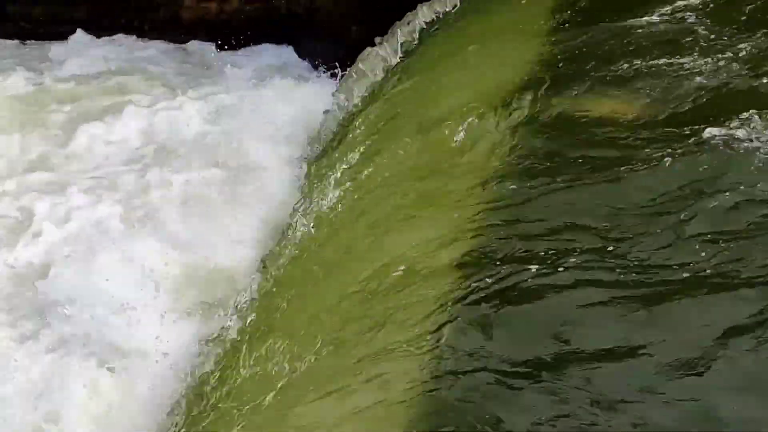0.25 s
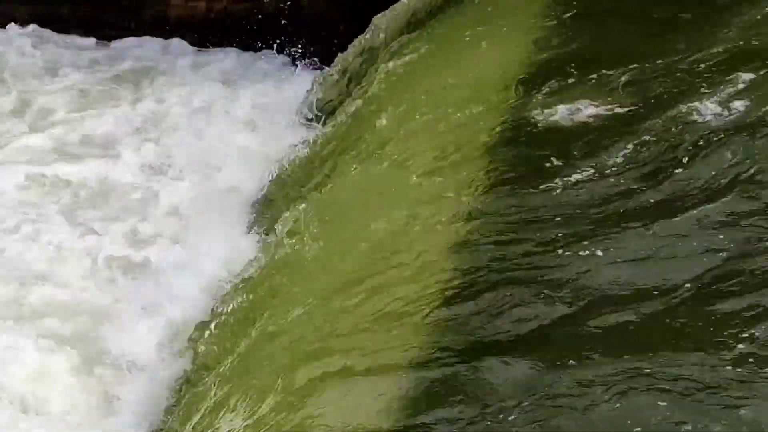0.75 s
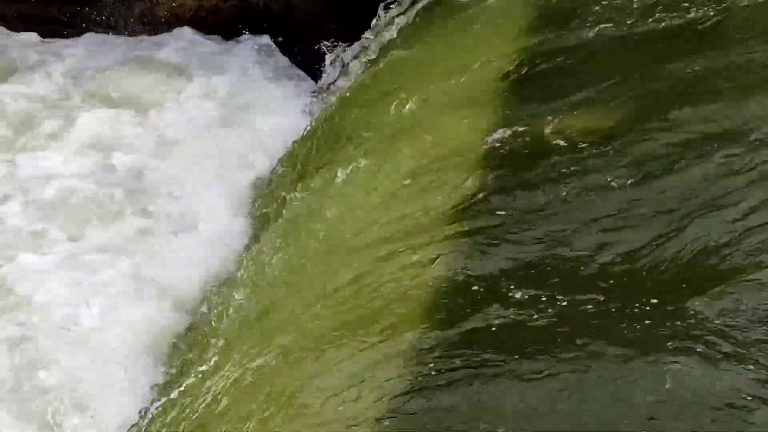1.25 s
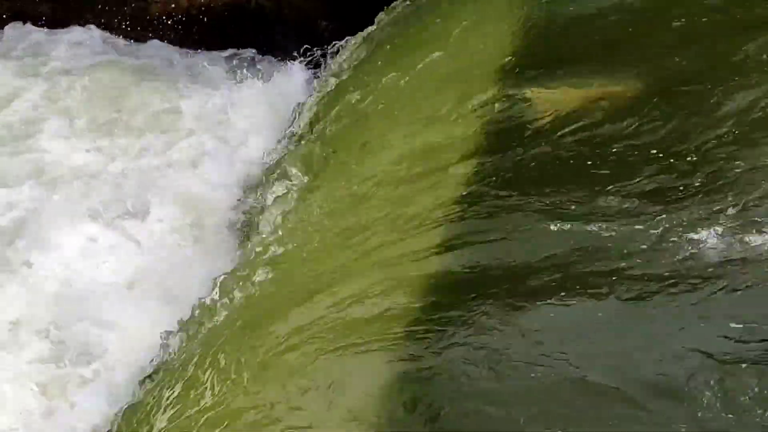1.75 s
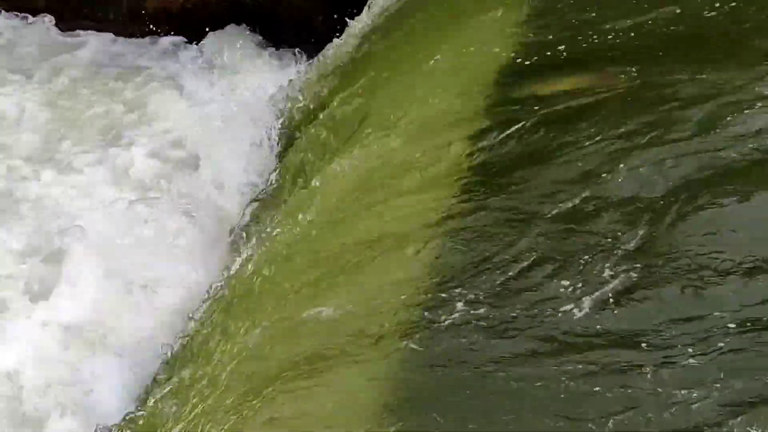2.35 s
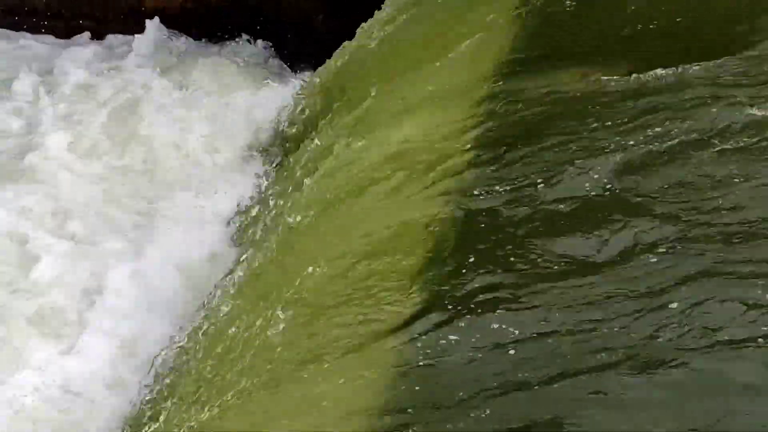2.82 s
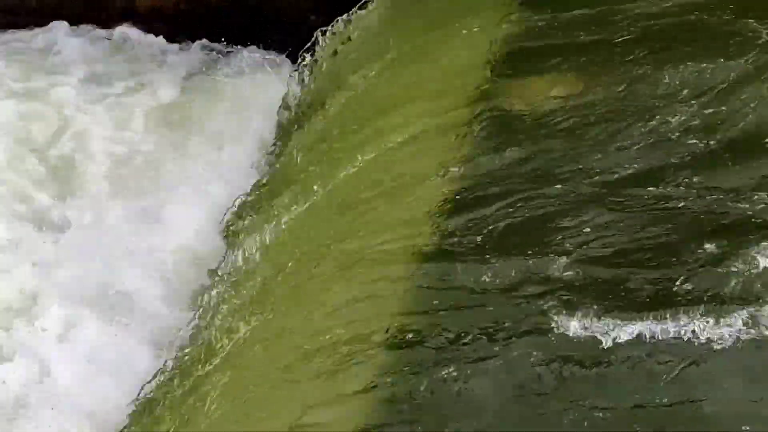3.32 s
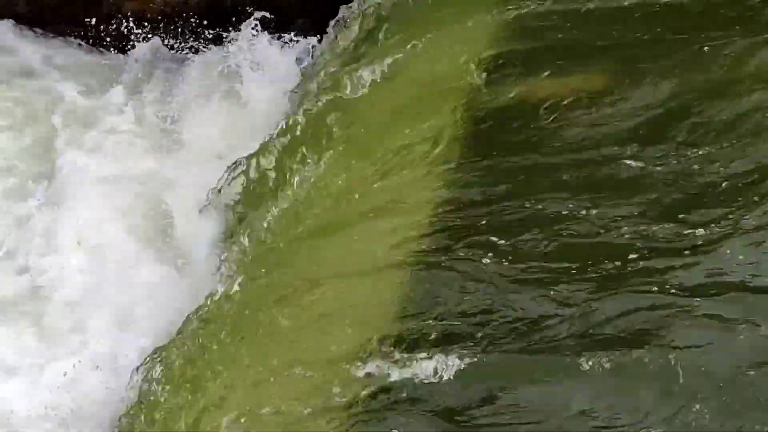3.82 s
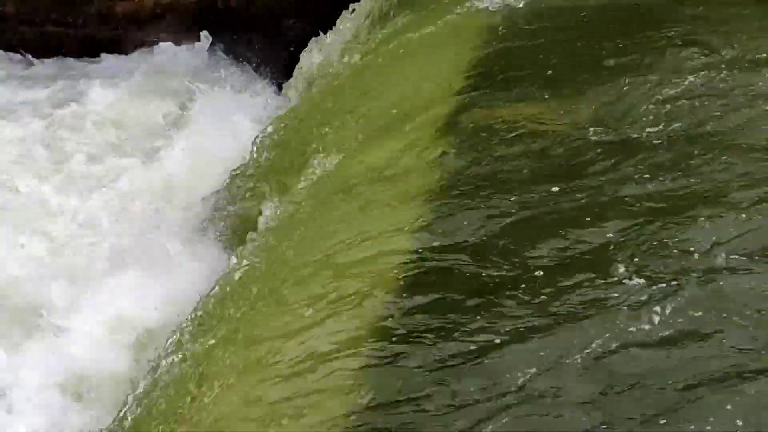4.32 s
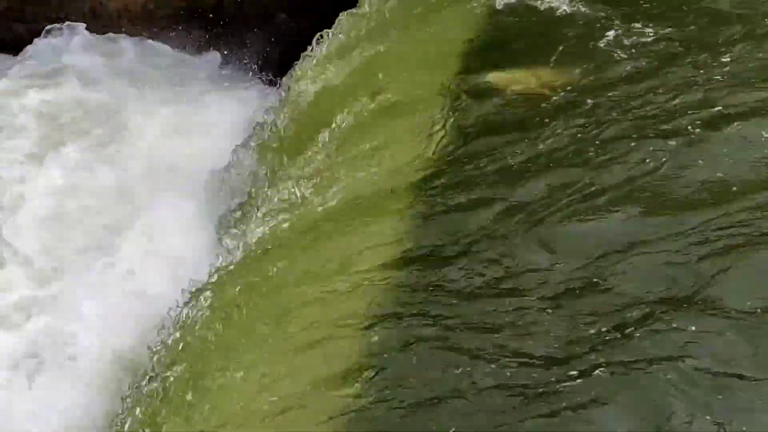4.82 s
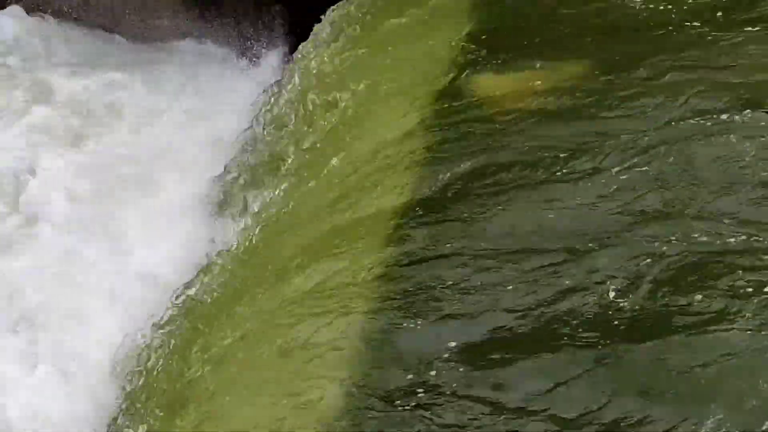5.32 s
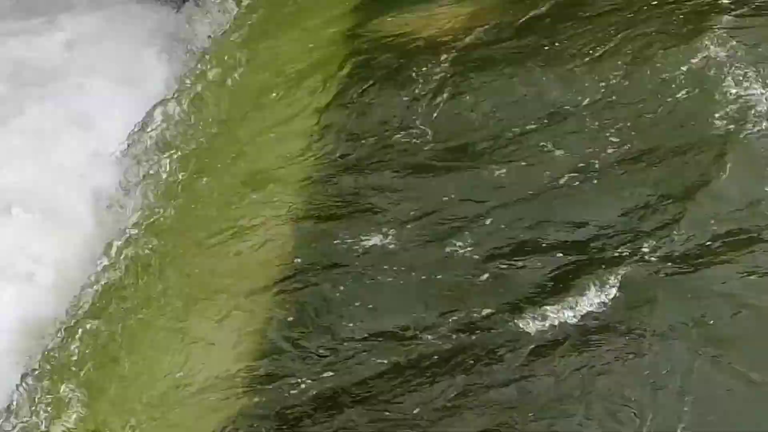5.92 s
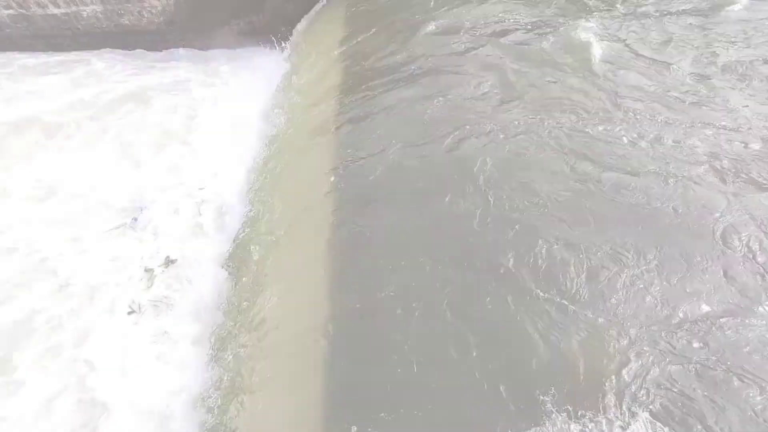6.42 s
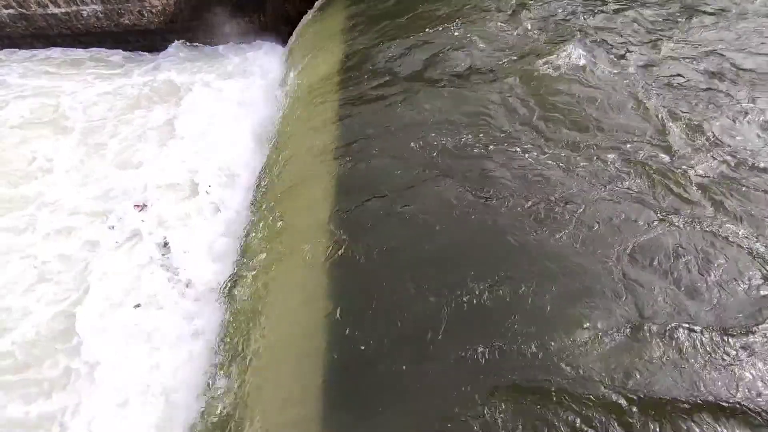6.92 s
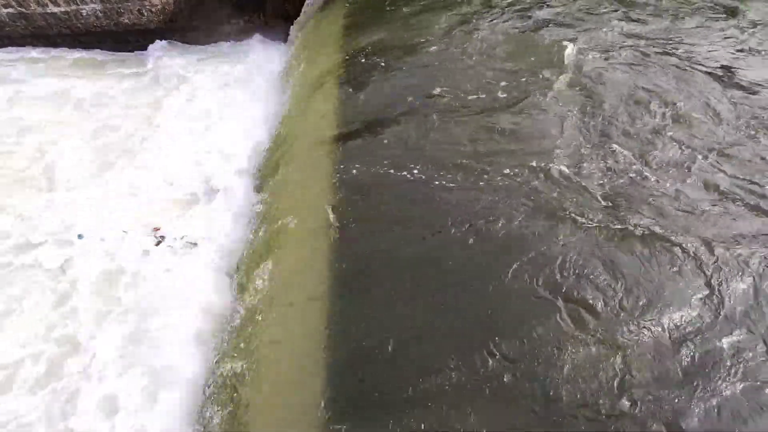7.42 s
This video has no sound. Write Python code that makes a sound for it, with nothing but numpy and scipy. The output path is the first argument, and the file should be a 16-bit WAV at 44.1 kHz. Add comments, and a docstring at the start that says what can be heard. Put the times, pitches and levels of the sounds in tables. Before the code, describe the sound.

Heavy water pours over a weir in a dense low rumble with bubbling foam, dips briefly to near silence, then returns slightly louder.

```python
"""At a concrete weir a river pours into a pool of white water, heard by a mono microphone at two spots on the bank.
Clouds of trapped air throb in the plunge pool, single bubbles ring in the foam, and spray patters back as a fine hiss;
all three are random impulses ringing resonators, mixed with noise. Now and then a mass of air collapses with a thump:
the roar swells briefly, and a limiter ducks the whole rush where peaks pass its ceiling. A far bird, two swept sines,
chirps faintly twice at the first spot. The sound fades out there and fades in again at the second spot."""
import sys
import numpy as np
from scipy import signal
from scipy.fft import rfft, irfft, next_fast_len
from scipy.io import wavfile
from scipy.ndimage import uniform_filter1d, minimum_filter1d

SR = 44100
rng = np.random.default_rng(int(sys.argv[2]) if len(sys.argv) > 2 else 0)


def generate_wav(signal):
    """Clip the signal to [-1, 1] and save it as 16-bit WAV at the path in sys.argv[1]."""
    frames = np.transpose(np.atleast_2d(signal))
    scaled = np.clip(frames, -1, 1) * 32767
    pcm = np.round(scaled).astype(np.int16)
    wavfile.write(sys.argv[1], SR, pcm)


N = 337806


def from_db(db):
    """Decibels to gain."""
    return 10 ** (np.asarray(db) / 20)


def rms_one(x):
    """Scale to an rms of 1."""
    return x / np.sqrt(np.mean(x ** 2) + 1e-20)


def in_time(rows):
    """Each column after the time as a curve over all samples, straight between the rows."""
    time_s, *columns = np.transpose(rows)
    return [np.interp(np.arange(N) / SR, time_s, column) for column in columns]


def bump(center_s, length_s):
    """A smooth rise and fall from 0 to 1 and back, centred on a moment."""
    shape_s = center_s + length_s * np.linspace(-.5, .5, 33)
    return np.interp(np.arange(N) / SR, shape_s, np.hanning(33))


def drift(rate_hz):
    """Slow chance with a spread of 1: noise twice through a one-pole low-pass."""
    step = 40  # samples between slow values
    pole = np.exp(-2 * np.pi * rate_hz * step / SR)
    noise = rng.standard_normal(N // step + 2002)
    # the first values, where the filter settles, are dropped
    slow = signal.lfilter([1], [1, -2 * pole, pole * pole], noise)[2000:]
    return np.interp(np.arange(N) / step, np.arange(len(slow)), rms_one(slow))


def coloured(x, spectrum):
    """Filter a sound by a spectral curve that falls away steeply past its ends; rms 1."""
    size = next_fast_len(N)
    octave = np.log2(np.maximum(np.arange(size // 2 + 1) * SR / size, 1))
    pitch_hz, level_db = np.transpose(spectrum)
    edge = np.log2(pitch_hz)
    octaves_outside = np.abs(octave - np.clip(octave, edge[0], edge[-1]))
    gain_db = np.interp(octave, edge, level_db) - 60 * octaves_outside
    return rms_one(irfft(rfft(x, size) * from_db(gain_db), size)[:N])


def grains(per_s, spread_db, low_hz, high_hz, cycles, count):
    """Random impulses of uneven size ring resonators that fall 60 dB in some cycles; even in spectrum, rms 1."""
    born = np.flatnonzero(rng.random(N) < per_s / SR)
    size, sign, pitch = rng.random((N, 3))[:len(born)].T
    # many small impulses and a few large ones, capped in size
    size_db = spread_db * np.minimum(-np.log(1 - size), 4)
    push = from_db(size_db) * np.sign(sign - .5)
    resonator = (pitch * count).astype(int)
    out = np.zeros(N)
    for k, hz in enumerate(np.geomspace(low_hz, high_hz, count)):
        clicks = np.zeros(N)
        clicks[born] = push * (resonator == k)
        radius = np.exp(-np.log(1000) * hz / (cycles * SR))
        angle = 2 * np.pi * hz / SR
        ringing = signal.lfilter([1, 0, -1], [1, -2 * radius * np.cos(angle), radius ** 2], clicks + 1e-18)
        # higher resonators cover more hertz, so they carry more power
        out += np.sqrt(hz) * rms_one(ringing)
    return rms_one(out)


# colour of the plunge pool at the first and second spot: pitch_hz, level_db (relative, per Hz)
ROAR_COLOUR_FIRST = [(15, -38), (30, -31), (45, -19.5), (62, -10.5), (85, -5), (120, -3.5), (165, 0.67),
                     (265, -2), (320, -6.5), (390, -14), (450, -19.5)]
ROAR_COLOUR_SECOND = [(18, -43.5), (35, -29), (50, -21), (72, -6.5), (118, -5), (152, -0.5), (195, -4),
                      (245, -4.5), (310, -9.5), (365, -17.5), (450, -29)]
# depth of the plunge; a deeper one traps larger, lower clouds: time_s, bass_lift_db (treble gets the opposite)
PLUNGE_DEPTH = [(.4, 0.2), (.9, -2.3), (3.7, -1.4), (4.6, 1.8), (5.3, 0.8), (5.9, 2.5), (6.5, -0.9),
                (7.1, 0.7)]


def roar(spectrum, churn_db=0.0, throb_db=-0.1, pivot_hz=180):
    """Air clouds pulse for a few cycles each over the churning of the pool."""
    clouds = grains(per_s=700, spread_db=3.0, low_hz=55.0, high_hz=415, cycles=6.6, count=14)
    churn = coloured(rng.standard_normal(N), [(20, 0.0014), (500, 0.0025)])
    pool = coloured(clouds + from_db(churn_db) * churn, spectrum)
    # the large clouds and the small ones trade level as the plunge deepens
    large = signal.sosfiltfilt(signal.butter(2, pivot_hz, fs=SR, output="sos"), pool)
    small = pool - large
    lift_db, = in_time(PLUNGE_DEPTH)
    pool = large * from_db(lift_db) + small * from_db(-lift_db)
    # so many clouds overlap that the power over a quarter second hardly varies
    power = uniform_filter1d(pool ** 2, size=SR // 4)
    steady = pool / np.sqrt(power + 1e-12)
    return rms_one(steady * from_db(throb_db * drift(21)))


# colour of the foam at the first and second spot: pitch_hz, level_db (relative, per Hz)
FOAM_COLOUR_FIRST = [(400, -3.5), (480, -0.5), (620, -5.5), (950, -9.5), (1060, -13.5), (1220, -15.5),
                     (1400, -26), (1500, -30)]
FOAM_COLOUR_SECOND = [(400, -1), (460, -.5), (560, -4), (610, -2), (900, -7), (1000, -9.5), (1070, -19),
                      (1140, -18.5), (1280, -13.5), (1500, -23)]


def foam(spectrum, folding, wash_db=0.0, folding_db=-0.04):
    """Bubbles ring, more of them as the white water folds over; far ones merge into a wash."""
    bubbles_per_s = 2400 * from_db(2.5 * folding)
    bubbles = grains(bubbles_per_s, spread_db=2.5, low_hz=390.5, high_hz=1558, cycles=8.6, count=20)
    wash = coloured(rng.standard_normal(N), [(350, 0), (1600, 0.0091)])
    return coloured((bubbles + from_db(wash_db) * wash) * from_db(folding_db * folding), spectrum)


# colour of the spray at the first and second spot: pitch_hz, level_db (relative, per Hz)
SPRAY_COLOUR_FIRST = [(1300, -17), (1500, -4.5), (1720, 0), (2350, -2.5), (2850, -7.5), (3480, -8.5),
                      (3620, -12), (4200, -15.5), (5120, -9.5), (5680, -15), (5950, -6.5), (6400, -5),
                      (6900, -0.9), (7550, -0.5)]
SPRAY_COLOUR_SECOND = [(1300, -18), (1520, -1), (1900, -1.5), (2250, 1), (2850, -6), (3480, -7.5),
                       (3620, -12.5), (4400, -14.5), (4900, -14), (5720, -15), (6000, -5), (6900, -2.5),
                       (7300, -2.5), (7550, -10.5)]


def spray(spectrum, folding, mist_db=0.0, folding_db=0.21, flicker_db=0.07):
    """Drops and tiny bubbles tick in bursts over a smooth mist."""
    drops_per_s = 7000 * from_db(2.5 * drift(25))
    drops = grains(drops_per_s, spread_db=2.0, low_hz=1340, high_hz=7960, cycles=6, count=16)
    mist = coloured(rng.standard_normal(N), [(1200, 0), (8000, 0.008)])
    level_db = folding_db * folding + flicker_db * drift(45)
    return coloured((drops + from_db(mist_db) * mist) * from_db(level_db), spectrum)


# the white water folds over in a bigger splash: center_s, foam_rise_db
BIG_SPLASHES = [(.19, 2.5), (2.73, 3.5), (3.58, 3), (4.21, 1.5), (5.25, 1.5), (6.73, 4), (6.98, 3),
                (7.1, 3.5), (7.61, 0)]


def splash_rise(length_s=0.12):
    """Bigger splashes as a smooth rise and fall of level in dB."""
    return sum(rise_db * bump(center_s, length_s) for center_s, rise_db in BIG_SPLASHES)


# a mass of trapped air collapses with a thump: center_s, peak_db (aim for the swollen part of the roar)
AIR_THUMPS = [(.355, -3.5), (3.255, -1), (3.499, -2.5), (3.861, -1.8), (4.3, 0), (4.438, -2.5),
              (4.671, -.7), (5.01, -2.5), (5.393, 0), (5.56, 0), (5.812, -2.1), (7.267, 0.5), (7.39, 0)]


def thumping(pool, lowest_hz=120, length_s=0.027):
    """The air clouds pulse together and the roar, but for its deepest part, swells towards the thump's peak."""
    clouds = signal.sosfiltfilt(signal.butter(3, lowest_hz, "high", fs=SR, output="sos"), pool)
    out = pool.copy()
    for center_s, peak_db in AIR_THUMPS:
        swell = clouds * bump(center_s, length_s)
        # a roar that is already louder is left alone
        out += swell * max(from_db(peak_db) / np.abs(swell).max() - 1, 0)
    return out


# the plunge pool at the first and second spot swells and eases slowly: time_s, roar_db, foam_db
POOL_FLOW_FIRST = [(0, -16, -28), (.45, -13.5, -26), (.85, -17.5, -27), (2.45, -17, -26.5),
                   (2.75, -14.5, -26.5), (3.6, -14.5, -28), (4.6, -13, -27.5), (5.3, -13.5, -28.5),
                   (6, -13, -30.5)]
POOL_FLOW_SECOND = [(6.5, -14, -27), (7.1, -11.5, -27.5), (7.66, -12.5, -28)]


def weir(flow, spray_db, roar_colour, foam_colour, spray_colour, spray_share=0.26):
    """The weir from one spot; bigger splashes lift the foam, and the spray by a share of that rise."""
    roar_db, foam_db = in_time(flow)
    folding = drift(18)  # shared by foam and spray
    rise_db = splash_rise()
    plunge_pool = thumping(from_db(roar_db) * roar(roar_colour))
    bubbling = from_db(foam_db + rise_db) * foam(foam_colour, folding)
    hiss = from_db(spray_db + spray_share * rise_db) * spray(spray_colour, folding)
    return plunge_pool + bubbling + hiss


# faint chirps of a far bird: start_s, length_s, start_hz, end_hz, level_db (rms before its soft ends)
BIRD_CHIRPS = [(3.328, .07, 3400, 3490, -47.5), (3.705, 0.09, 3070, 3480, -50)]


def bird():
    """Each chirp is a rising sine whistle with soft ends, barely clear of the water."""
    out = np.zeros(N)
    for start_s, length_s, start_hz, end_hz, level_db in BIRD_CHIRPS:
        at, size = round(start_s * SR), round(length_s * SR)
        phase = 2 * np.pi * np.cumsum(np.linspace(start_hz, end_hz, size)) / SR
        whistle = np.sqrt(2) * np.sin(phase) * signal.windows.tukey(size, .5)
        out[at:at + size] += from_db(level_db) * whistle
    return out


CHANGE_S = 6.325  # moment the microphone's spot changes


def fade(out_s=0.54, in_s=.51, floor_db=-34.5):
    """The gain falls in a straight line to the change of spot and climbs back after it."""
    since_s = np.arange(N) / SR - CHANGE_S
    return np.minimum(from_db(floor_db) + np.maximum(-since_s / out_s, since_s / in_s), 1)


def scene():
    """The weir from the first spot with the bird, then from the second, in mono."""
    first = weir(POOL_FLOW_FIRST, -33.5, ROAR_COLOUR_FIRST, FOAM_COLOUR_FIRST, SPRAY_COLOUR_FIRST) + bird()
    second = weir(POOL_FLOW_SECOND, -35, ROAR_COLOUR_SECOND, FOAM_COLOUR_SECOND, SPRAY_COLOUR_SECOND)
    return np.where(np.arange(N) / SR < CHANGE_S, first, second)[None]


def limited(x, ceiling_db=-2.8, release_db_per_s=23, opening_duck_db=1.5):
    """A limiter, already ducked at the start, dips just ahead of each peak over the ceiling and recovers slowly."""
    over_db = np.maximum(20 * np.log10(np.abs(x) + 1e-9) - ceiling_db, 0)
    # held peaks minus a steady ramp: the duck eases at the release rate
    ramp_db = release_db_per_s * np.arange(N) / SR
    held_db = np.maximum(np.maximum.accumulate(over_db + ramp_db, axis=-1), opening_duck_db)
    gain_db = ramp_db - held_db
    look_ahead = 353  # samples, 8 ms
    early_db = minimum_filter1d(gain_db, size=look_ahead)
    return x * from_db(uniform_filter1d(early_db, size=look_ahead))


def record(dry, cutoff_hz=7580):
    """The limiter ducks the peaks; then come the fades and a steep cut of the top."""
    faded = limited(dry) * fade()
    low_pass = signal.firwin(1601, cutoff_hz, window="blackman", fs=SR)
    return signal.fftconvolve(faded, low_pass[None], mode="same")


dry = scene()
out = record(dry)
generate_wav(out)
```